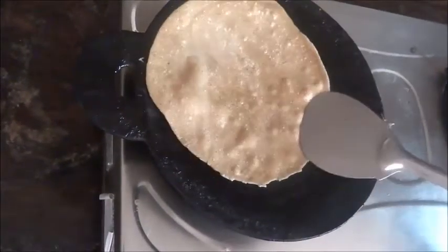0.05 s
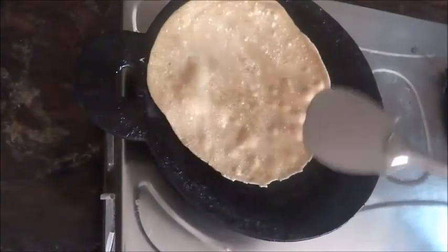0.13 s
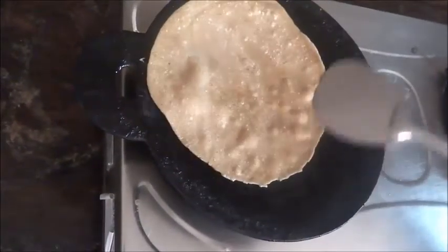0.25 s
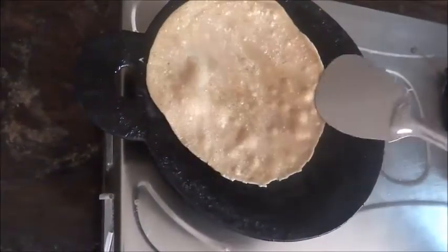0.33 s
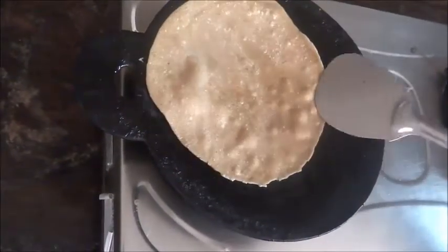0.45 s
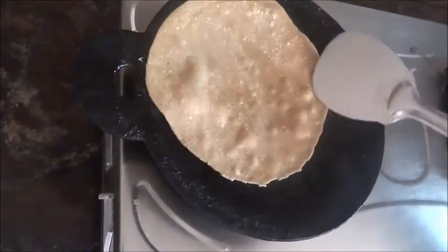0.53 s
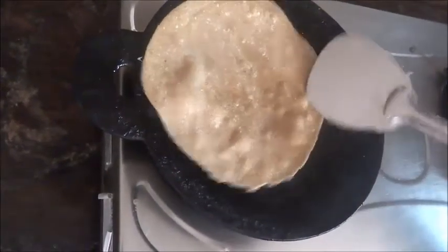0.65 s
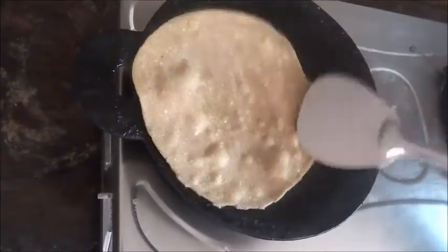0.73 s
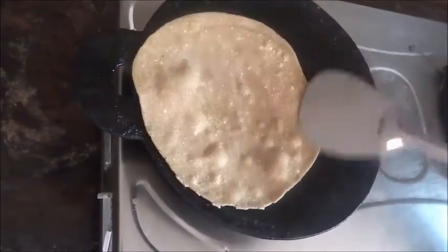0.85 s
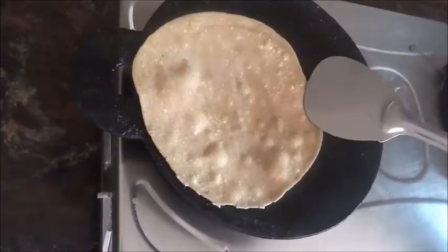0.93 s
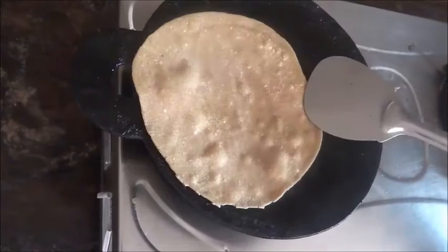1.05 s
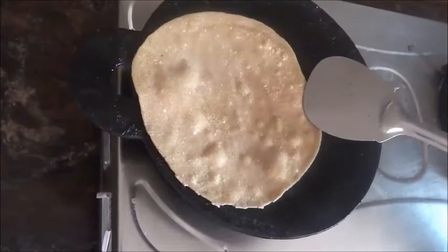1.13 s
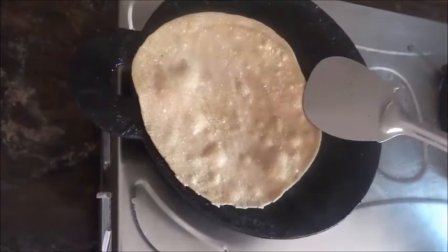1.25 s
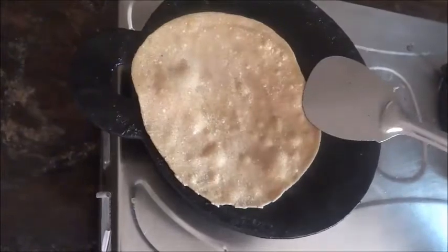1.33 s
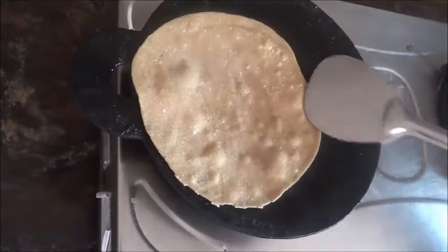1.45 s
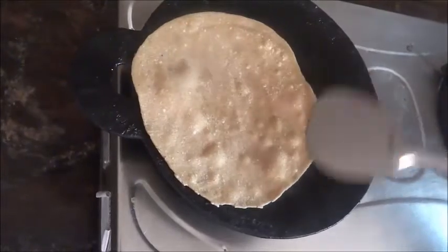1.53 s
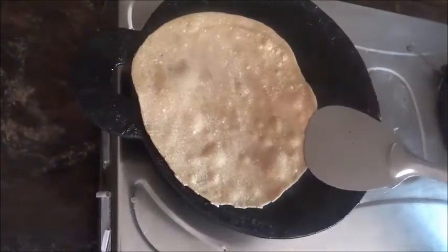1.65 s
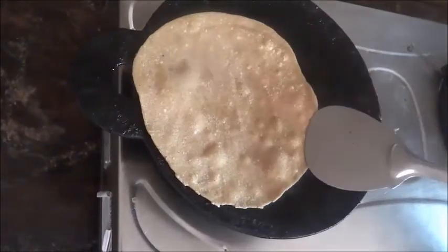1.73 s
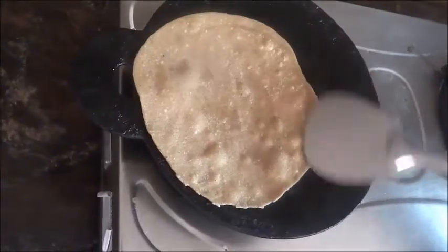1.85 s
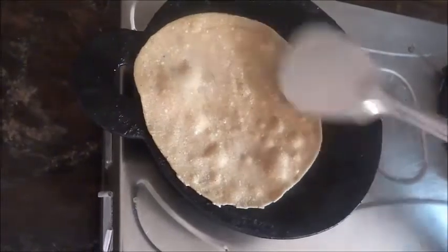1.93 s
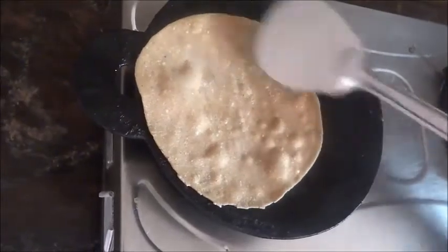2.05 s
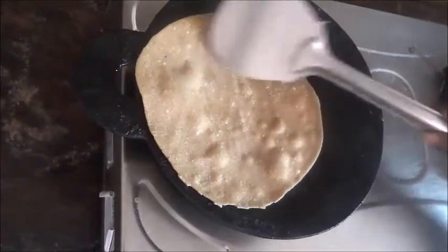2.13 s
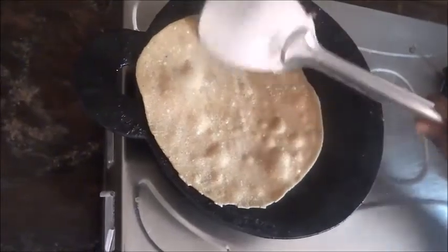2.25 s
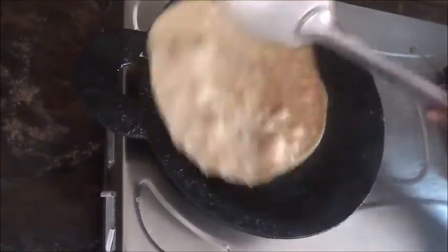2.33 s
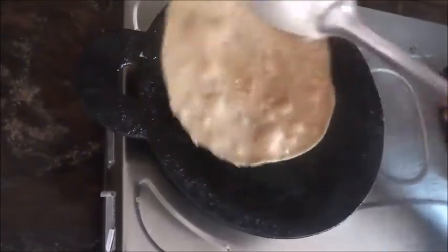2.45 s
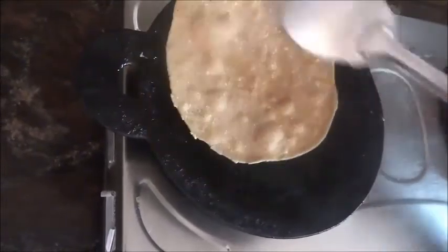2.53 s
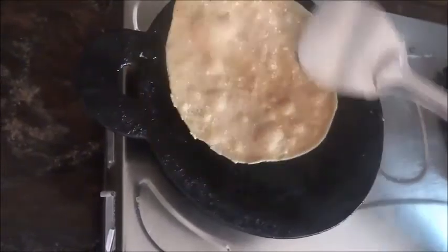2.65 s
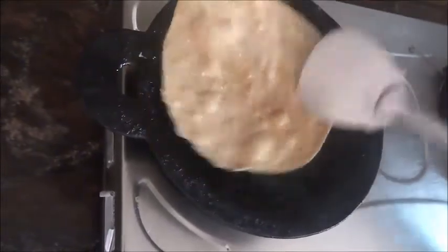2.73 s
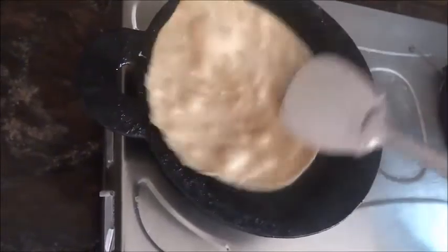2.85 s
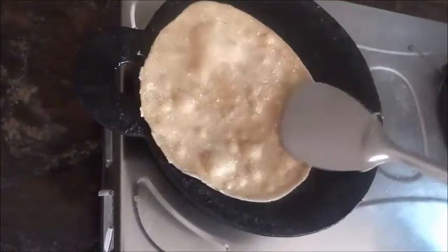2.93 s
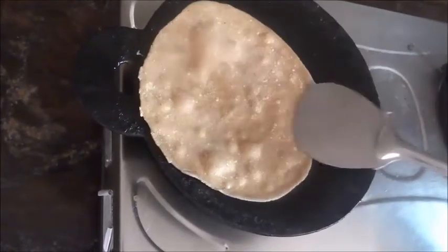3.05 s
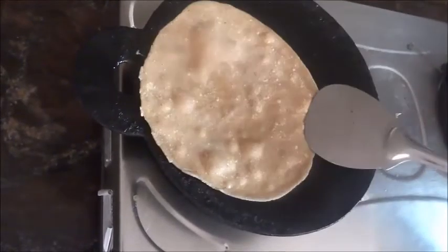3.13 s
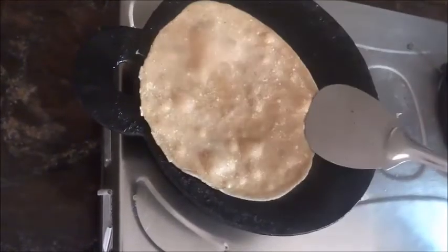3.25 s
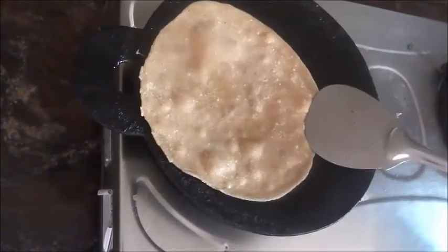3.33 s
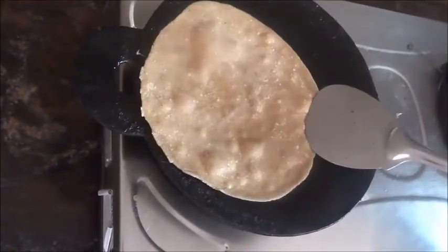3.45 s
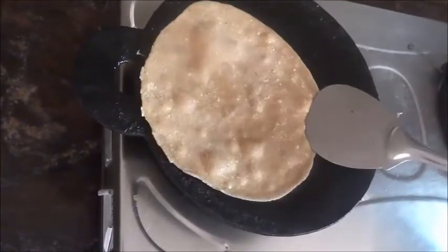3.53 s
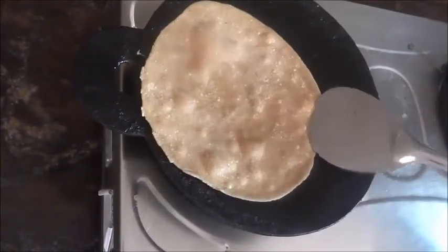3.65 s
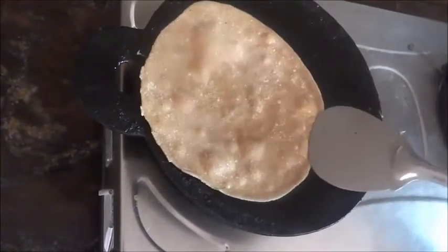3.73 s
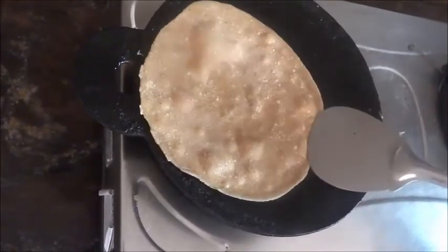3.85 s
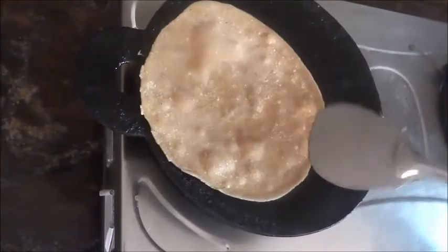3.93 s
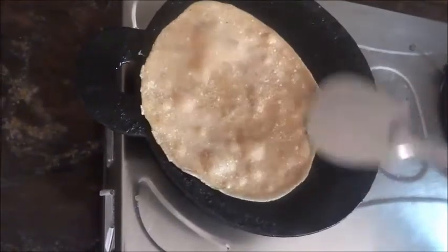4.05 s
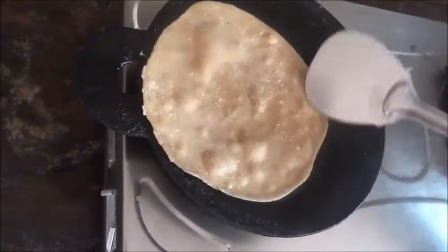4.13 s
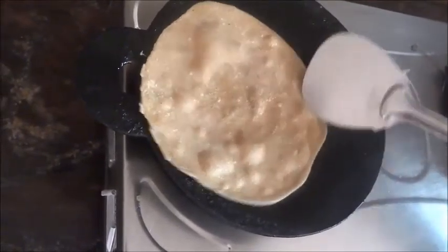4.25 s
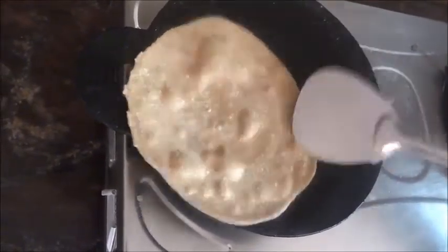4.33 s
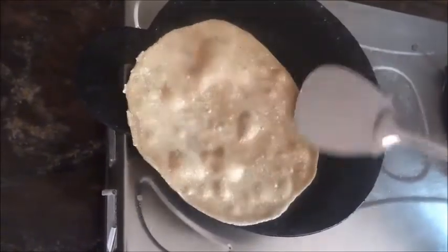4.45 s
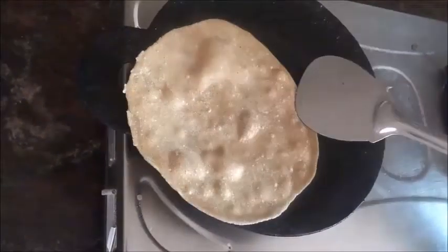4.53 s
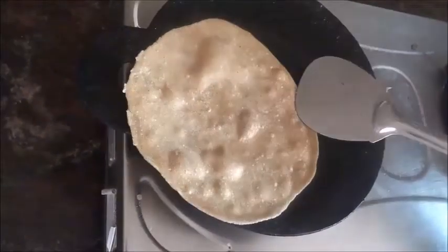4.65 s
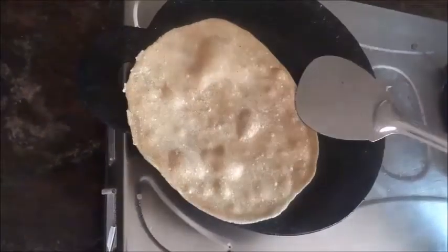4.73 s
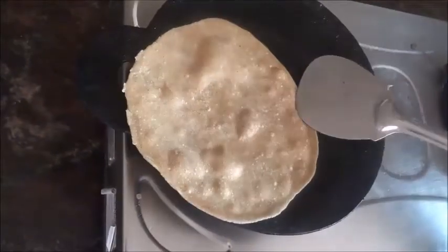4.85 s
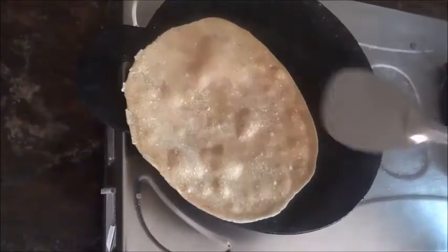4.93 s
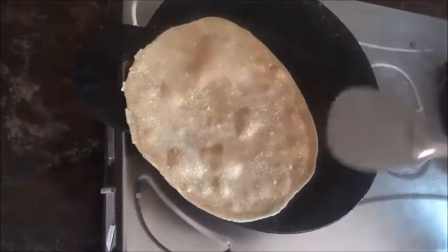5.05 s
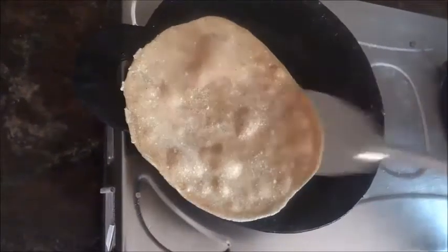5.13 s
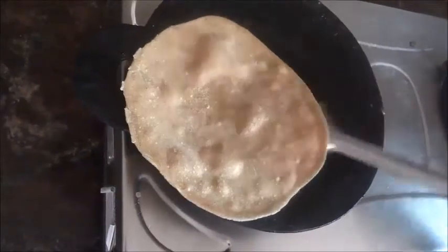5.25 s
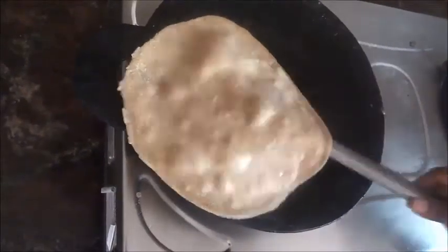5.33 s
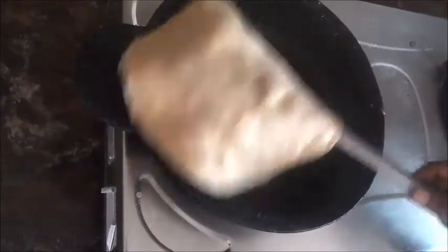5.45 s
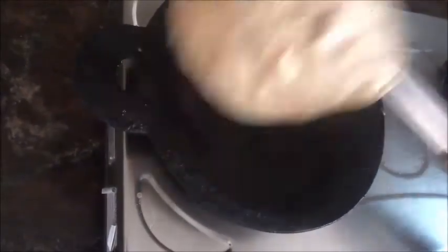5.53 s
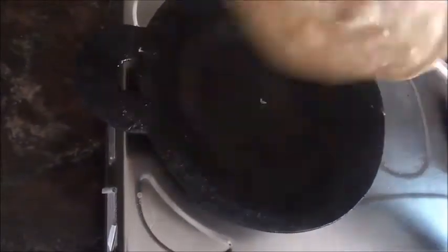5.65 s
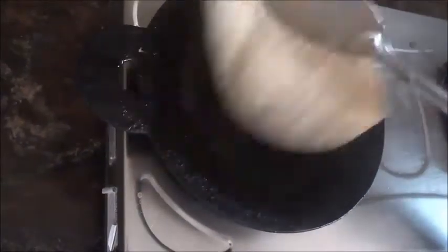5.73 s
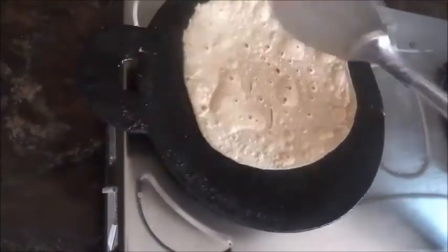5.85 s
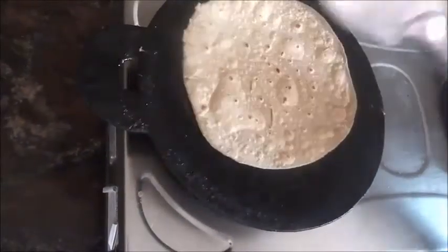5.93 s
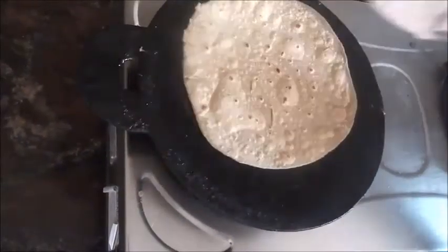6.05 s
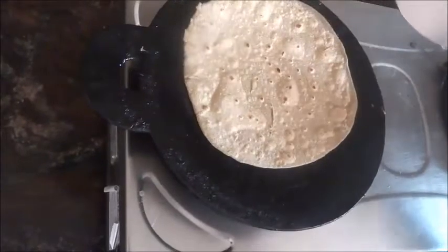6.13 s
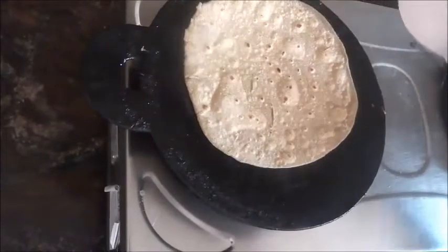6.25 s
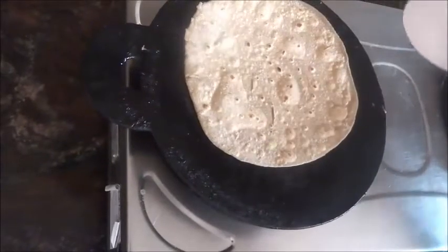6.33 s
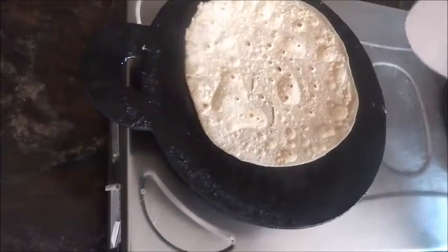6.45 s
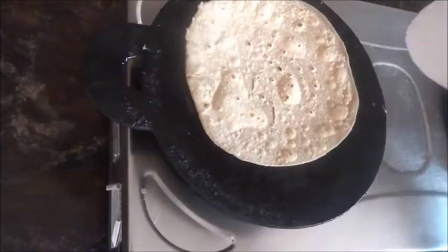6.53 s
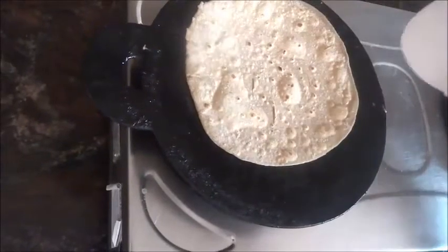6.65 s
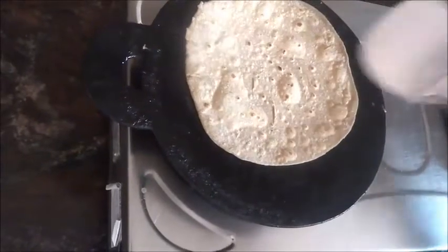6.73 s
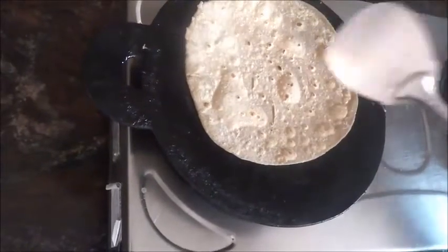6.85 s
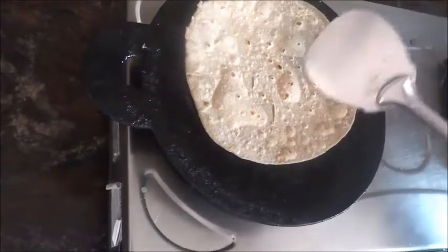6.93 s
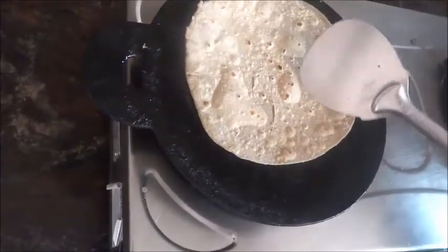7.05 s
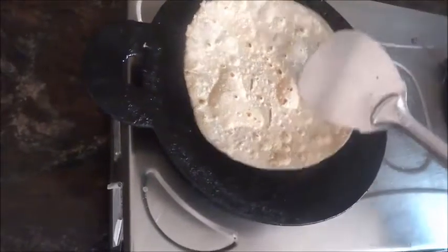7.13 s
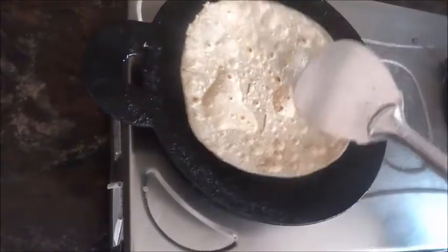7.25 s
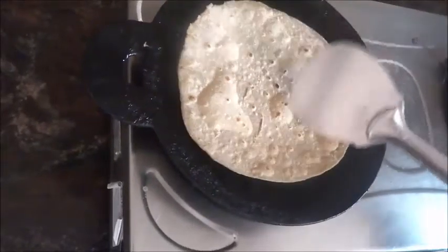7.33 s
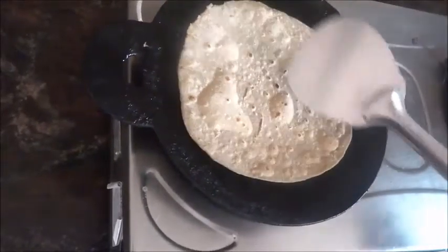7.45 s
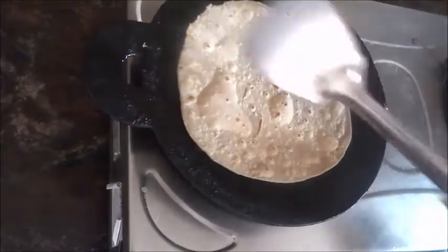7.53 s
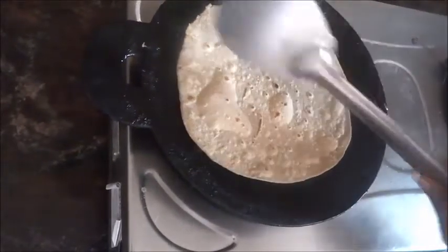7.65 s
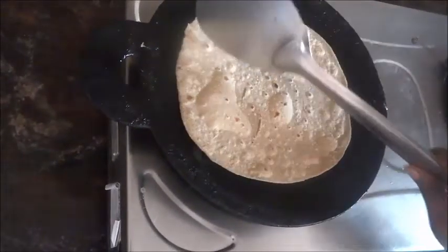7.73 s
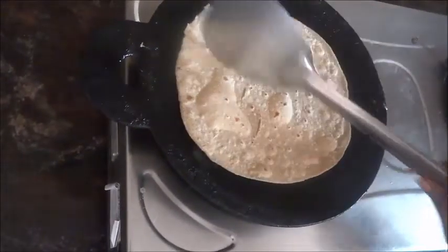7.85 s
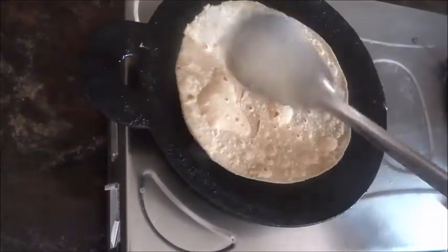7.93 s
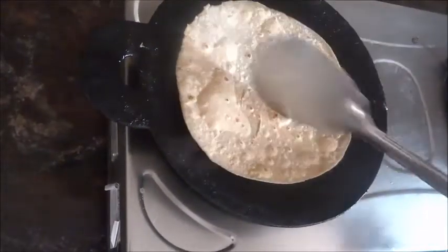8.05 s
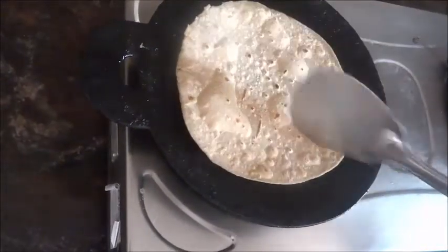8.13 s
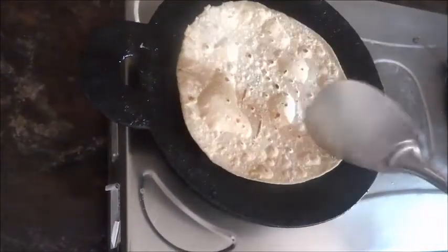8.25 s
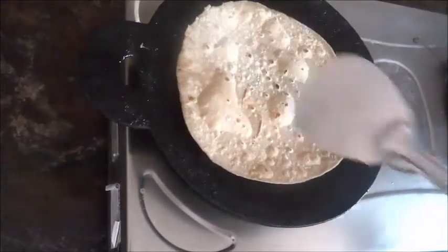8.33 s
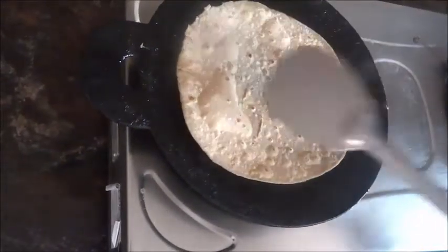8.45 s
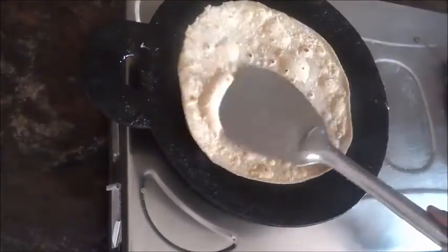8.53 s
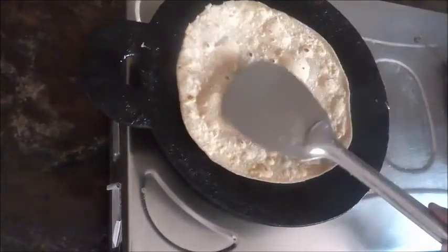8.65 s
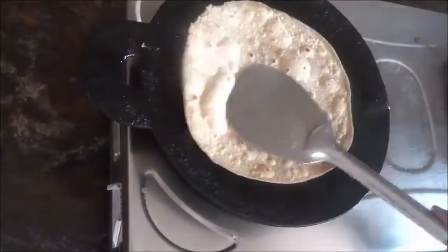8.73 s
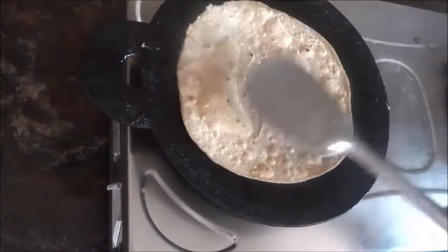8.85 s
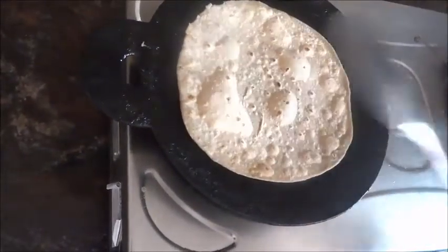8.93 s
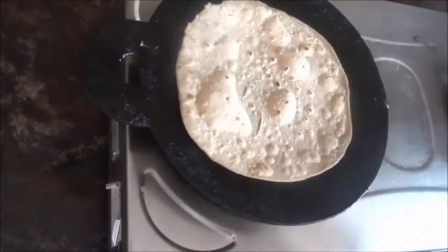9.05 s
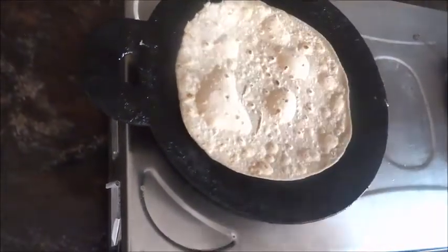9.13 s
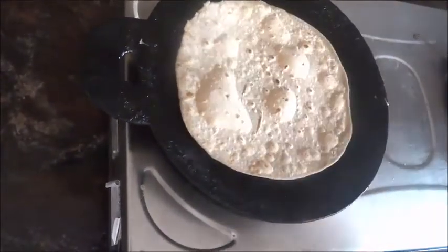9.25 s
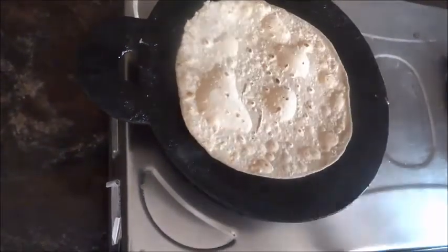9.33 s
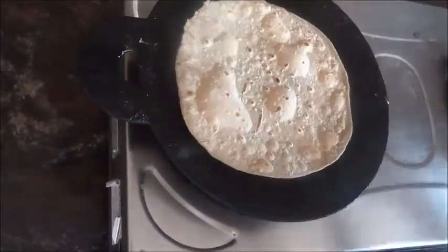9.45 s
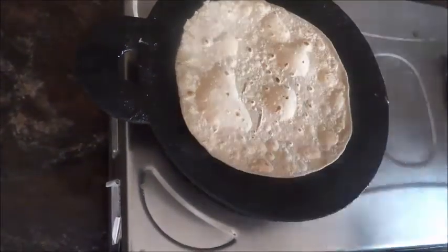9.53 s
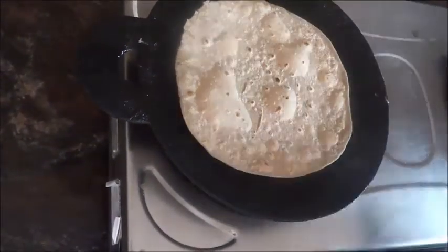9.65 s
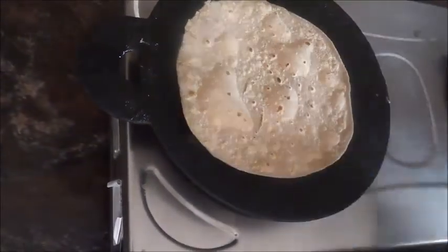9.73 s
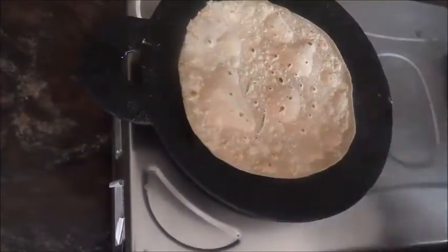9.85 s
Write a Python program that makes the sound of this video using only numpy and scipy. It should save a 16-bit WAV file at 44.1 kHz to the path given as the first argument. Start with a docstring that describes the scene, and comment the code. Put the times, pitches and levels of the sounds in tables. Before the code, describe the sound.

Bright, gritty sizzling comes and goes over quiet kitchen air, a gas flame and low hum. Rounded sliding scrapes move the bread, sometimes faintly singing, and fat spits in small bursts. Midway the blade digs noisily beneath it and the pan is struck hard. The sizzle thins; later a steel vessel clatters with a short ring and a thin distant whistle ends in brief chirps. Close two-port microphone, short hard reflections.

```python
"""A flatbread sizzles on a hot iron pan, close to a two-port microphone in a small hard kitchen: shaped, patchy grit.
A steel spatula slides it about, scrapes under it, knocks the pan and rubs it faintly: swelling grit, cracks, decaying modes.
Fat bursts and the blade ticks, in snaps and fizzes; light rubbing sings through narrow resonances. Something heavy is
dragged briefly, a steel vessel clatters and a thin tone wavers in two swells and short bursts, over kitchen air,
a gas flame and a low hum."""
import sys
import numpy as np
from scipy import signal
from scipy.fft import rfft, irfft, next_fast_len
from scipy.io import wavfile
from scipy.ndimage import uniform_filter1d, map_coordinates

SR = 44100
rng = np.random.default_rng(int(sys.argv[2]) if len(sys.argv) > 2 else 0)


def decibels_to_gain(level_db):
    """Convert a level in decibels to a linear amplitude gain (20 dB per decade)."""
    exponent = np.asarray(level_db, float) / 20
    return 10 ** exponent


def store_wav(level_fs):
    """Save 16-bit WAV to argv[1]."""
    pcm = np.round(np.clip(np.atleast_2d(level_fs), -1, 1) * 32767)
    wavfile.write(sys.argv[1], SR, pcm.T.astype(np.int16))


N = 436590  # samples, 9.9 s

# Fat under the bread: start_s, hiss_db
SIZZLE = [(0, -37.5), (.1, -41), (.3, -37.5), (.6, -43), (.9, -38), (1.1, -36.5), (1.45, -42.5),
          (1.58, -49.5), (1.8, -43), (2.0, -48), (2.65, -47.5), (3.1, -39.5), (3.45, -37), (3.76, -43),
          (4.0, -40.5), (4.75, -38), (5.03, -46.5), (5.7, -50), (6.5, -43.5), (6.87, -46.5), (7.6, -43),
          (8.44, -54.5), (9.08, -46.5), (9.5, -43), (9.9, -44)]
# Bread pushed round the pan: peak_s, hiss_db, swell_s (over 20 dB), fade_s (over 20 dB), blade_over_hiss_db
SLIDES = [(.76, -22.5, 0.12, 0.1, -10.5), (2.422, -21.5, 0.14, 0.14, -7), (2.881, -22, 0.17, .14, -8.5),
          (4.39, -25, 0.18, 0.072, -8.5), (7.2, -32, 0.28, .3, -31), (8.0, -25, 0.093, .22, -10)]
# Fat flaring up under a touch: peak_s, hiss_db, fade_s (over 20 dB)
FLARES = [(1.02, -36, 0.59), (1.64, -42, 0.9), (2.23, -36.5, .2), (3.46, -31, 0.24), (3.82, -28.5, 0.55),
          (4.935, -32.5, 0.065), (5.76, -36.5, 0.062), (6.68, -33.5, 0.094), (7.05, -49, 0.38),
          (7.53, -50, 0.067), (7.891, -25, .15), (8.265, -39, 0.33), (8.56, -37.5, .15), (9.17, -36, 0.049),
          (9.27, -40, 0.11)]
# Steel edge striking or digging into iron: peak_s, hiss_db, swell_s (over 20 dB), fade_s (over 20 dB), blade_over_hiss_db
BITES = [(1.842, -48.5, .004, 0.026, 16), (1.903, -50, .004, .03, 9.5), (5.056, -21.5, .004, 0.052, 1),
         (5.068, -17, 0.011, 0.088, -1.5), (5.135, -17.5, 0.042, 0.18, -1.5), (5.17, -19.5, .03, .15, -0.5),
         (5.23, -15, 0.048, 0.083, -2.5), (5.277, -14, 0.017, 0.11, 0), (5.34, -33, .03, 0.17, 0.5),
         (8.716, -22, 0.0033, 0.046, 11), (8.76, -30.5, 0.059, 0.041, 7.5),
         (8.801, -32, 0.0036, 0.023, 16.5), (8.84, -38, 0.043, 0.071, 10)]
# Dull shudders of pan and bread after heavy contact: peak_s, body_db, swell_s (over 20 dB), fade_s (over 20 dB)
SHUDDERS = [(.33, -51, 0.088, 0.19), (1.858, -38.5, 0.024, 0.13), (2.72, -34.5, 0.036, 0.24),
            (4.11, -23, 0.057, 0.2), (5.862, -17, 0.017, 0.11), (5.909, -19, 0.075, 0.12),
            (7.07, -33.5, 0.027, 0.17), (8.57, -42, 0.078, 0.05), (8.721, -28.5, .006, 0.16),
            (8.778, -17, 0.053, 0.13), (8.84, -26, 0.068, 0.17)]
# Colour of the bright contact hiss: frequency_hz, relative_density_db (per Hz)
HISS_COLOUR = [(350, -21), (600, -23.5), (951, -20.5), (1160, -21.5), (1350, -5), (1850, -4.5), (3280, -3),
               (4780, -3), (9200, -1.5), (10900, 0), (14200, -17), (22000, -120)]
# Colour of the dull body of pan and bread: frequency_hz, relative_density_db (per Hz)
BODY_COLOUR = [(150, -26.5), (250, -12.5), (322, -8), (474, -10), (618, -4.5), (754, -3.5), (880, -2),
               (1110, -3.5), (3500, -13), (4550, -16), (7700, -120)]
# Resonances of the spatula blade: frequency_hz, width_hz, relative_level_db
BLADE_MODES = [(2010, 65, 1.5), (2350, 70, 6.5), (2643, 95, 4.5), (3010, 94, 1.5), (3650, 570, -4.5),
               (4430, 120, -3), (5390, 110, -4.5), (7360, 74, -7)]
# Kitchen air and gas flame: frequency_hz, relative_density_db (per Hz)
AIR_COLOUR = [(18, -41), (30, -25), (69, -12.5), (182, 2), (1240, 8), (1850, 1.5), (2670, 0), (5070, -27),
              (10100, 3), (10900, -5.5), (14200, -22), (22000, -120)]
# Likeness of the air at the two microphone ports: frequency_hz, correlation (-1 to 1)
PORT_LIKENESS = [(60, 1), (220, 0.31), (830, 0.043), (3110, 0.088), (11600, 1)]
# Bursting fat, and a few sharp ticks of the blade: start_s, level_db (before snap and fizz are weighted and filtered)
SNAPS = [(0.2447, -23), (0.3536, -19.5), (0.3873, -22), (0.449, -23), (0.5076, -18.5), (0.6146, -26),
         (1.019, -18), (1.1475, -14.5), (1.178, -19), (1.2287, -20.5), (1.259, -23), (1.904, -21.5),
         (2.034, -30.5), (2.07, -29), (3.125, -19.5), (3.2991, -20.5), (3.3795, -15.5), (3.406, -16),
         (3.4441, -18), (3.467, -15), (3.5006, -19), (3.519, -21), (3.537, -15.5), (3.6154, -14.5),
         (3.8242, -14), (4.018, -14.5), (4.6665, -26), (4.7557, -19), (4.92, -21.5), (5.0539, -32),
         (6.2944, -34), (6.54, -28), (6.6248, -23), (7.049, -15.5), (7.53, -15.5), (7.6646, -20.5),
         (7.7702, -27), (7.8234, -19), (8.26, -22.5), (8.2819, -16), (8.4915, -27.5), (8.5505, -27),
         (8.7166, -20), (8.7999, -30), (9.57, -26.5), (9.8056, -22)]
# Blows, and faint rubs that keep the pan ringing: start_s, level_db, pan_over_level_db, vessel_over_level_db, rattle_t60_s
BLOWS_AND_RUBS = [(0.328, -29, -13, -17.5, 0.03), (1.841, -26, -7, -20.5, 0.041),
                  (1.871, -34, -4.5, -32, 0.033), (2.716, -23.5, -19.5, -17.5, 0.045),
                  (4.076, -27.5, -1, -30, 0.036), (5.055, -16, -19, -21, 0.044),
                  (5.159, -17, -15, -32.5, 0.034), (5.273, -19.5, -14, -22.5, 0.04),
                  (5.857, -5, -28, -26, 0.035), (5.908, -9.5, -18.5, -23.5, 0.068),
                  (6.43, -51, -1, -39, 0.04), (6.5, -47, -3, -39, 0.055), (6.6, -50, -3, -37, 0.04),
                  (6.675, -26.5, -13.5, -37, 0.11), (6.951, -43, -3.5, -33, 0.036),
                  (7.07, -26, -22.5, -16.5, 0.037), (8.714, -16.5, -24, -12, 0.07),
                  (8.767, -12, -17, -20, 0.014), (8.8, -28, -21, -17, 0.02), (8.839, -13, -10, -12, 0.037)]
# Modes of the iron pan: frequency_hz, relative_level_db, t60_s
PAN_MODES = [(378, 0.5, 0.41), (430, -9, 0.52), (811, -3, 0.13), (980, -21, 0.41)]
# Modes of the steel vessel: frequency_hz, relative_level_db, t60_s
VESSEL_MODES = [(335, -8, 0.43), (551.7, -6, 1.29), (630, -14, 0.55), (746, -12, 0.82), (1480, -38, 0.24),
                (1910, -20, .4)]
# Light rubbing that sings: peak_s, level_db, swell_s (over 20 dB), fade_s (over 20 dB), pitch_hz
SINGS = [(.45, -46.5, .3, 0.18, 2370), (1.14, -45, .25, 0.21, 2290), (2.45, -32, 0.15, .12, 954),
         (3.42, -46.5, .2, 0.24, 2260), (4.75, -46.5, 0.17, 0.26, 2250)]
# Course of the drag: start_s, tone_db (before each tone's own level), scrape_db
DRAG = [(4.049, -51, -42), (4.087, -54, -23.5), (4.146, -50, -20), (4.284, -37, -24), (4.682, -52.5, -49),
        (4.74, -73, -54)]
# Tones shaken out of the dragged weight's stand: pitch_hz, relative_level_db
STAND_TONES = [(74, -5), (137, 0.5)]
# Colour of the dragged scrape: frequency_hz, relative_density_db (per Hz)
SCRAPE_COLOUR = [(15, -40), (25, -5), (44, -19), (134, -9), (189, -11), (515, -3), (569, -6.5), (1190, -2),
                 (3000, -20), (3900, -47), (6600, -120)]
# A thin wavering tone that comes in two swells and ends in short bursts: start_s, pitch_hz, level_db (before wavering)
WHISTLE = [(7.74, 1175, -79), (7.82, 1173, -48.5), (8.1, 1268, -47), (8.3, 1262, -72), (8.68, 1259, -52),
           (9.0, 1244, -49), (9.26, 1243, -57), (9.3, 1245, -40.5), (9.35, 1235, -43), (9.365, 1243, -55),
           (9.385, 1222, -43), (9.42, 1192, -53), (9.47, 1160, -69)]
# Kitchen walls, before each use stretches them: frequency_hz, t60_s
WALL_DECAY = [(200, 0.34), (2000, 0.62), (10000, 0.051)]
# Gain of the side reflections: frequency_hz, gain_db
SIDE_GAIN = [(60, -20), (170, -29), (490, -9.5), (1410, -8.5), (4050, -13), (11600, -14)]

DOME = 2.25  # exponent of a swell that peaks roundly; 1 is straight in decibels


def unit(x):
    """Bring to rms 1."""
    return x / np.sqrt(np.mean(x ** 2) + 1e-20)


def along(points, hz):
    """Read (Hz, value) points on a log frequency axis."""
    f, v = np.transpose(points)
    return np.interp(np.log(hz + 1), np.log(f + 1), v)


def curves(rows):
    """One value per sample for each column after the time."""
    s, *cols = np.transpose(rows)
    return [np.interp(np.arange(N) / SR, s, c) for c in cols]


def wobble(rate):
    """A smooth random curve, rate knots a second."""
    knots = rng.standard_normal(int(N * rate / SR) + 4)
    return map_coordinates(knots, [np.arange(N) * rate / SR])


def filtered(x, response):
    """Multiply the spectrum of x by a response of frequency."""
    m = next_fast_len(N + SR // 2)
    return irfft(rfft(x, m) * response(np.fft.rfftfreq(m, 1 / SR)), m)[..., :N]


def resonances(modes):
    """Causal response of (Hz, width Hz, dB) resonances, alternating in sign."""
    def response(f):
        return sum((-1) ** k * decibels_to_gain(db) * 1j * f * w / (c * c - f * f + 1j * f * w)
                   for k, (c, w, db) in enumerate(modes))
    return response


def grit(spread_db):
    """A dense stream of tiny contacts of uneven size, rms 1."""
    size = np.minimum(rng.exponential(size=N), 4)
    return unit(rng.standard_normal(N) * decibels_to_gain(spread_db * size))


def coloured(x, spectrum):
    """Give x a smooth spectrum, rms 1."""
    return unit(filtered(x, lambda hz: decibels_to_gain(along(spectrum, hz))))


def patchy(x, depth_db, size=256):
    """Random patches of gain over time and frequency; a larger size gives narrower, longer streaks."""
    z = signal.stft(x, nperseg=size)[2]
    across_hz = uniform_filter1d(rng.standard_normal(z.shape), 4, 0)
    field = uniform_filter1d(across_hz, 12, 1)
    return unit(signal.istft(z * decibels_to_gain(depth_db * unit(field)), nperseg=size)[1][:N])


def tone(hz):
    """A sine of rms 1 that follows a pitch curve."""
    return np.sqrt(2) * np.sin(2 * np.pi * np.cumsum(hz) / SR)


def swell(s, db, rise, fade, power=1):
    """Power of one event that peaks at s and lies 20 dB down at rise before and fade after."""
    t = np.arange(N) / SR
    distance = np.where(t < s, (s - t) / rise, (t - s) / fade)
    return decibels_to_gain(db - 20 * distance ** power) ** 2


def contact():
    """Amplitudes of hiss, body and blade: every kind of contact drives the three in its own mix."""
    # each part: power, then (hiss, body, blade) in dB over it
    parts = [(decibels_to_gain(curves(SIZZLE)[0]) ** 2, (0, -17.5, -17.5))]
    for s, db, rise, fade, blade_db in SLIDES:
        parts.append((swell(s, db, rise, fade, DOME), (0, -14, blade_db)))
    for s, db, rise, fade, blade_db in BITES:
        parts.append((swell(s, db, rise, fade), (0, -15.5, blade_db)))
    flares = sum(swell(s, db, 0.044, fade) for s, db, fade in FLARES)  # swells 20 dB in 0.044 s
    parts.append((flares, (0, -18, -24)))
    parts.append((sum(swell(*row) for row in SHUDDERS), (-10.5, 0, -13)))
    return np.sqrt(sum(decibels_to_gain(mix)[:, None] ** 2 * power for power, mix in parts))


def stroke(levels):
    """Sizzle and sliding contact: bright grit, dull body of pan and bread, blade ring and a rumble in the stove."""
    flutter_db = 0.5 * wobble(25) + 1.15 * wobble(90)  # the contact chatters over the rough iron
    hiss = patchy(coloured(grit(spread_db=1.5), HISS_COLOUR), depth_db=3.0, size=512)
    body = patchy(coloured(grit(spread_db=1.0), BODY_COLOUR), depth_db=3.5)
    blade = patchy(filtered(grit(spread_db=3), resonances(BLADE_MODES)), depth_db=4.5, size=768)
    low = coloured(rng.standard_normal(N), [(15, 5), (35, 9), (130, 8.0), (260, -6), (600, -120)])
    rumble = levels[0] ** 0.77 * decibels_to_gain(-35.5) * low  # follows the hiss less than in proportion
    return decibels_to_gain(flutter_db) * np.sum(levels * [hiss, body, blade], axis=0) + rumble


def air():
    """Diffuse kitchen noise, partly different at the two microphone ports, over a faint wavering hum."""
    def turn(hz):  # the angle between mid and side that gives the likeness
        return np.arccos(np.clip(along(PORT_LIKENESS, hz), -1, 1)) / 2

    noise = np.array([patchy(rng.standard_normal(N), depth_db=6.0) for _ in range(2)])
    mid, side = filtered(noise, lambda hz: decibels_to_gain(along(AIR_COLOUR, hz)) * [np.cos(turn(hz)), np.sin(turn(hz))])
    hum = decibels_to_gain(-71.5 + 1.8 * wobble(1.26)) * tone(74 + 1.21 * wobble(7.6))
    return decibels_to_gain(-48.5 + 0.23 * wobble(3.2)) * unit(np.array([mid + side, mid - side])) + hum


def snaps(hiss):
    """Bursting fat and a few blade ticks: a sharp snap and a short fizz; small dry ticks come by chance with the hiss."""
    bursts, t = np.zeros(N + SR), np.arange(SR // 16) / SR
    hiss_db = np.minimum(20 * np.log10(hiss), -33)
    events = [(s, db, 0) for s, db in SNAPS]  # start s, level dB, fizz dB
    for s, e in rng.random((260, 2)):  # small ticks, louder in a hotter sizzle
        tick_db = hiss_db[int(s * N)] + 8.5 - 4 * np.log(1 - .9 * e)
        events.append((s * N / SR, tick_db, -9))
    after = t - .0008
    snap = (after > 0) * decibels_to_gain(-60 * after / .0007) * np.cos(2 * np.pi * 7500 * after)
    fizz = (after > 0) * (decibels_to_gain(-9.5 - 60 * after / 0.04) + decibels_to_gain(-4.5 - 60 * after / 0.0042))
    for s, db, fizz_db in events:
        burst = 2 * snap + decibels_to_gain(fizz_db) * fizz * rng.standard_normal(len(t))
        bursts[round(s * SR):][:len(t)] += decibels_to_gain(db) * burst
    bright = signal.sosfilt(signal.butter(2, 5500, "high", fs=SR, output="sos"), bursts)
    dull = signal.sosfilt(signal.butter(1, 700, "high", fs=SR, output="sos"), bursts)
    return (bright + decibels_to_gain(-0.5) * dull)[:N]


def blows_and_rubs():
    """Blows, and faint rubs that keep the pan ringing: a noise rattle, and modes in step with what already rings."""
    rattles, rings, t = np.zeros(N + 2 * SR), np.zeros(N + 2 * SR), np.arange(SR) / SR

    def ring(modes, s):  # phase runs on absolute time, so the modes stay in step
        return sum(decibels_to_gain(db + rng.normal(0, 1) - 60 * t / t60) * np.sin(2 * np.pi * hz * (t + s))
                   for hz, db, t60 in modes)

    onset = 1 - np.exp(-t / 0.0017)
    for s, db, pan_db, vessel_db, rattle_t60 in BLOWS_AND_RUBS:
        start = round(s * SR)
        rattles[start:][:SR] += decibels_to_gain(db - 60 * t / rattle_t60) * rng.standard_normal(SR)
        ringing = decibels_to_gain(pan_db) * ring(PAN_MODES, s) + decibels_to_gain(vessel_db) * ring(VESSEL_MODES, s)
        rings[start:][:SR] += decibels_to_gain(db) * onset * ringing
    clack = signal.butter(1, [330, 4500], "band", fs=SR, output="sos")
    waver = decibels_to_gain(1.3 * wobble(9))
    return signal.sosfilt(clack, rattles)[:N], waver * rings[:N]


def sings():
    """Light rubbing sings in one narrow band: grit through a single resonance, in a dome like a slide."""
    total = np.zeros(N)
    for s, db, rise, fade, hz in SINGS:
        band = unit(filtered(grit(spread_db=4), resonances([(hz, 110, 0)])))  # 110 Hz wide
        total += np.sqrt(swell(s, db, rise, fade, DOME)) * band
    return total


def drag():
    """A dragged weight scrapes dully and shakes two low tones out of its stand."""
    before, after = (DRAG[0][0] - .02, -120, -120), (DRAG[-1][0] + .02, -120, -120)
    tone_db, scrape_db = curves([before, *DRAG, after])
    tones = sum(decibels_to_gain(db + 0.61 * wobble(15)) * tone(hz + 1.9 * wobble(15)) for hz, db in STAND_TONES)
    scrape = patchy(coloured(grit(spread_db=1.0), SCRAPE_COLOUR), depth_db=1.5)
    return decibels_to_gain(tone_db) * tones + decibels_to_gain(scrape_db) * scrape


def whistle():
    """A thin wavering tone in two swells and short bursts, from far off, with a steadier tone at half its pitch."""
    hz, db = curves(WHISTLE)
    hz = hz + 5 * wobble(40)
    flicker_db = 1.5 * wobble(30)
    undertone_db = np.minimum(db + 3, -63.5) + 1.9 * wobble(16)
    return decibels_to_gain(db + flicker_db) * tone(hz) + decibels_to_gain(undertone_db) * tone(hz / 2)


def walls(x, stretch):
    """Each frequency of the kitchen's answer dies at its own speed; no band is favoured."""
    hz, t, z = signal.stft(rng.standard_normal(SR // 2), SR, nperseg=256)
    decay = decibels_to_gain(-60 * t / (stretch * along(WALL_DECAY, hz)[:, None]))
    tail = rfft(signal.istft(z * decay, SR, nperseg=256)[1][:SR // 2])
    even = irfft(tail / np.sqrt(uniform_filter1d(np.abs(tail) ** 2, size=40)))
    late = np.pad(x, (200, 0))  # 200 samples, 4.5 ms, to the first reflection
    return signal.fftconvolve(late, even[:SR // 3] / np.linalg.norm(even))[:N]


def scene():
    """Near sounds reach both ports alike; only their reflections differ. Long tones gain little from the walls."""
    rattles, rings = blows_and_rubs()
    levels = contact()
    near = stroke(levels) + sings() + snaps(levels[0]) + rattles
    tones = rings + drag() + whistle()
    mid = near + decibels_to_gain(-10.5) * walls(near, stretch=0.71) + tones
    reflections = walls(near + decibels_to_gain(-2) * tones, stretch=0.15)
    side = filtered(reflections, lambda hz: decibels_to_gain(along(SIDE_GAIN, hz)))
    return np.array([mid + side, mid - side]) + air()


def roll_off(x):
    """The treble ends steeply here."""
    return signal.sosfilt(signal.butter(12, 12200, fs=SR, output="sos"), x)


def record(dry):
    """The preamp rounds off the highest peaks; above 10814 Hz the treble falls 0.12 dB per Hz, down to -70 dB."""
    rounded = dry / (1 + np.abs(dry / .8) ** 4) ** (1 / 4)
    kept = filtered(rounded, lambda hz: decibels_to_gain(-np.clip((hz - 10814) * 0.12, 0, 70)))
    return roll_off(kept)


dry = scene()
out = record(dry)
store_wav(out)
```